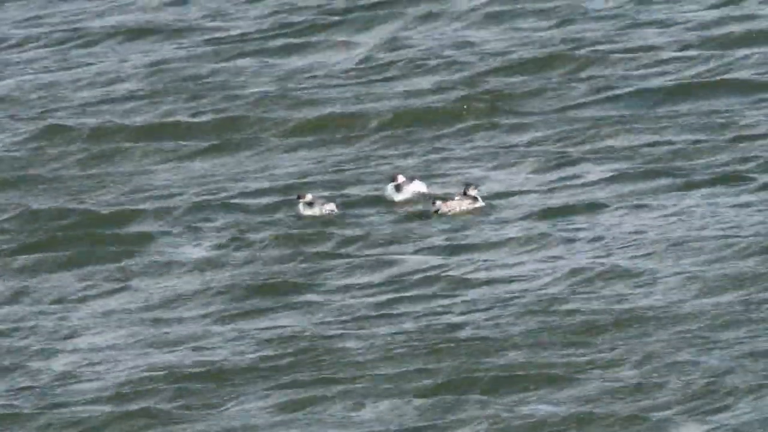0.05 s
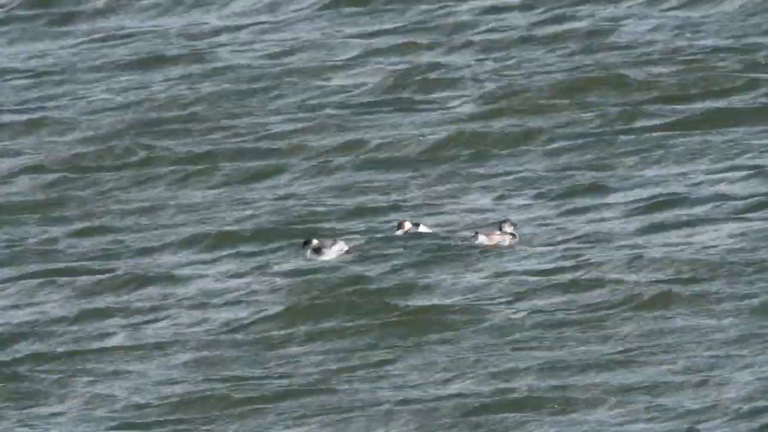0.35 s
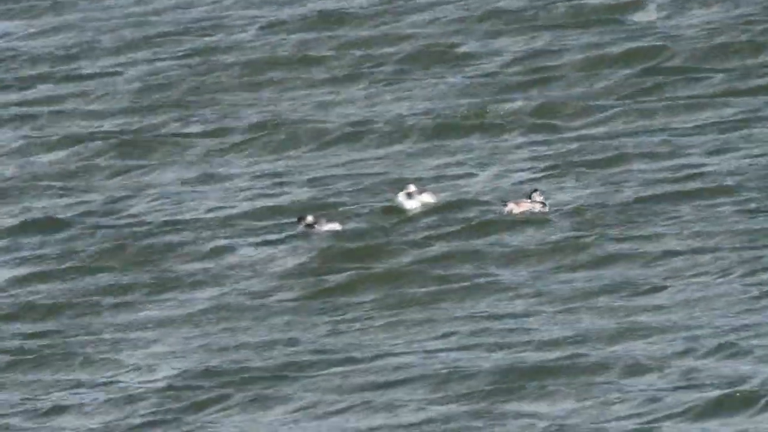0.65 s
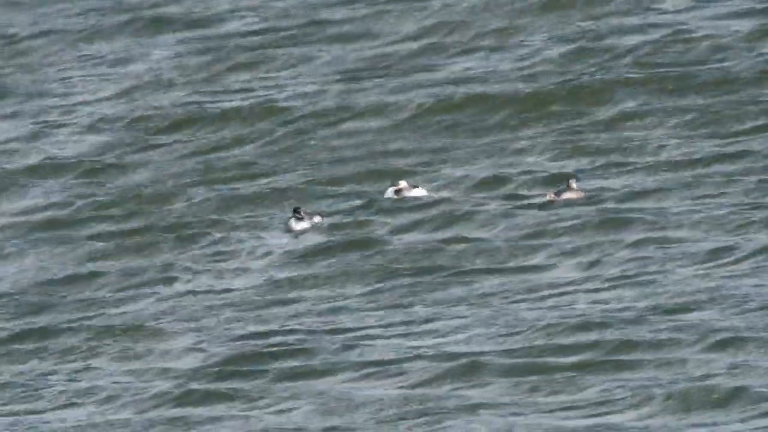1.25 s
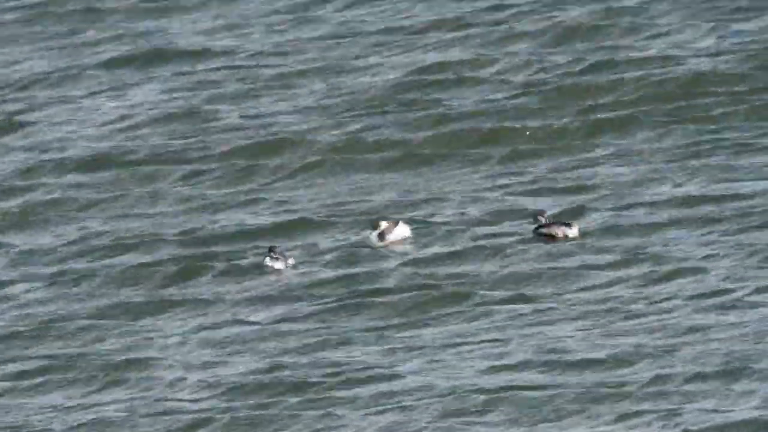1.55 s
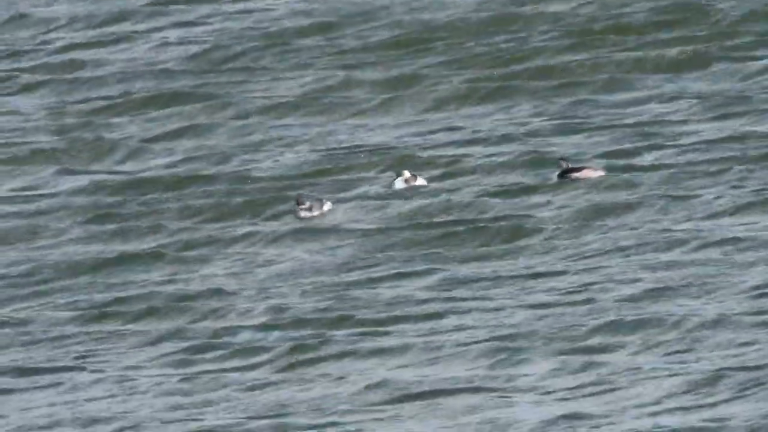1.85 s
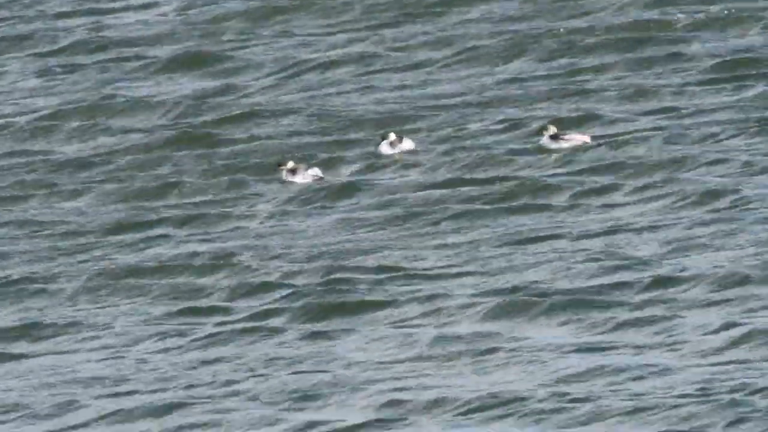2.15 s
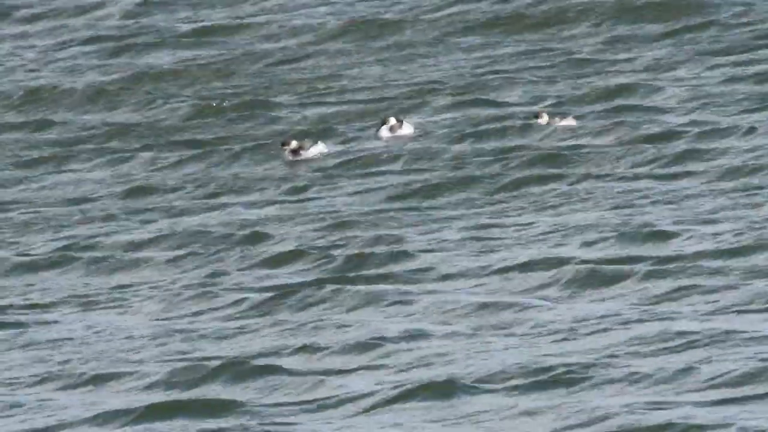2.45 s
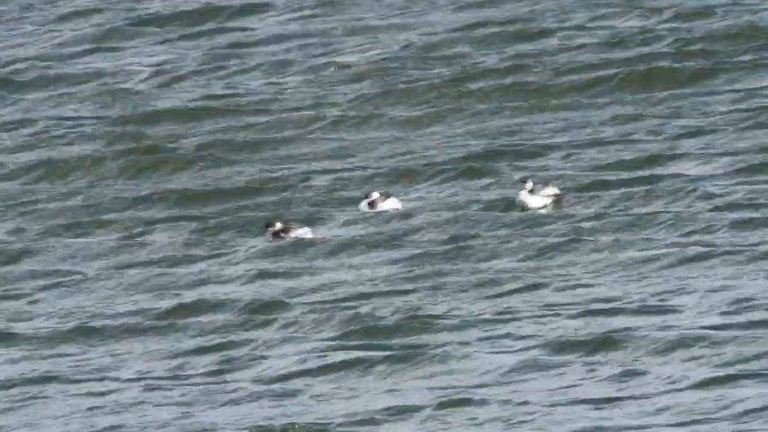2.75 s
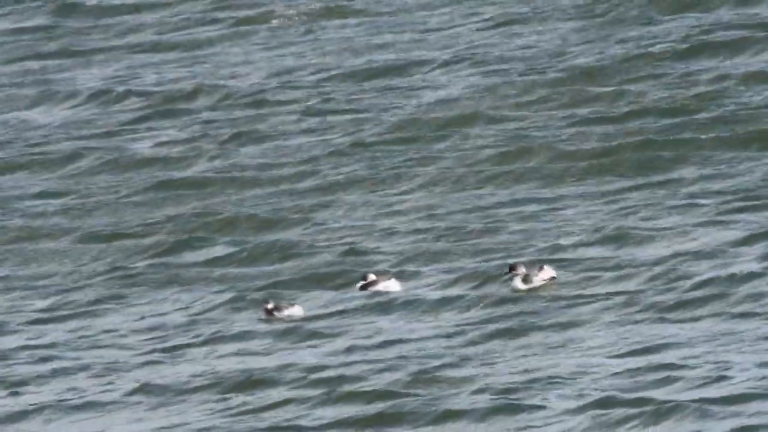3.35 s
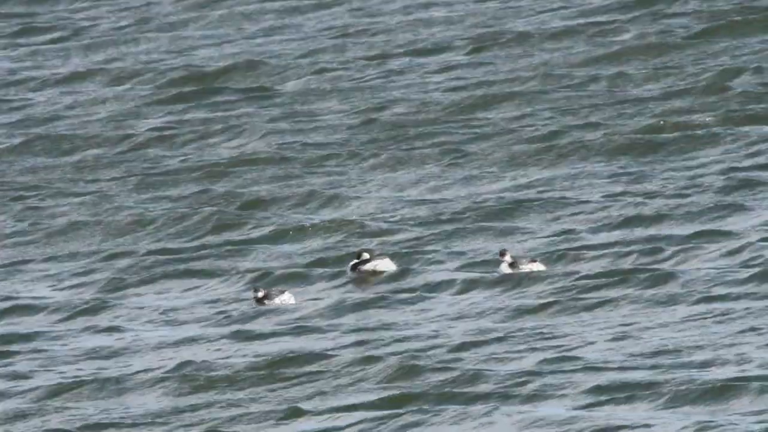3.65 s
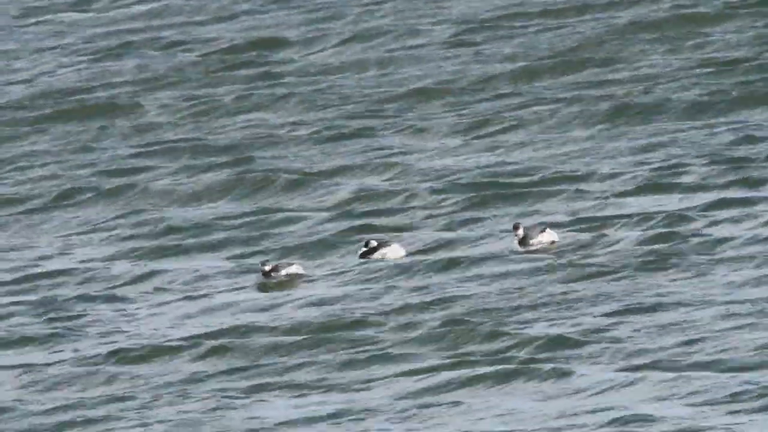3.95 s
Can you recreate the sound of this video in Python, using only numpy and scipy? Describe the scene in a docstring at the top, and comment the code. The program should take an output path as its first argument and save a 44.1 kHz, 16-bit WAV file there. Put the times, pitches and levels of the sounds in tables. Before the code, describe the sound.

Wind rumbles and thumps on the microphone in irregular gusts, with water washing faintly underneath.

```python
"""On the shore of open water, gusty wind buffets the two ports of a camera microphone.
Each port has its own turbulence: a soft, throbbing rumble in the lulls, quicker and brighter as the
wind presses harder, until it overloads the input and rasps. Hard eddies slap the ports, and the
recorder's processing adds a ragged hiss when the wind is loud. Underneath lie the faint wash of
choppy water and one tiny, high tick."""
import sys
import numpy as np
from scipy import signal
from scipy.io import wavfile
from scipy.ndimage import uniform_filter1d

SR = 44100
rng = np.random.default_rng(int(sys.argv[2]) if len(sys.argv) > 2 else 0)


def dump_mix(stems):
    """Bounce the given channels to the path in sys.argv[1] as a 16-bit WAV at rate SR."""
    frames = np.atleast_2d(stems).T  # one column per channel
    limited = np.clip(frames, -1, 1)  # hard clip at full scale
    pcm = np.round(limited * 32767).astype(np.int16)
    wavfile.write(sys.argv[1], SR, pcm)


N = 176400

# Tone of the water bed: pitch_hz, level_db
WATER_TONE = [(200, -58), (700, -71.5), (1200, -70.5), (2000, -69.5), (3300, -85), (5000, -94.5),
              (6500, -86.5), (9500, -101), (14000, -112)]
# Two broad dips the recorder cuts in the background treble: pitch_hz, width_hz
RECORDER_NOTCHES = [(2650, 3800), (7750, 4800)]
# Tone of the recorder's processing hiss: pitch_hz, level_db
RECORDER_HISS_TONE = [(1000, -100), (2600, -91), (4000, -95), (6000, -102.5), (8500, -110), (14000, -118)]
# Cues for hard eddies hitting a port: time_s, side (-1 left, 1 right), accent_db
SLAP_CUES = [(0.047, 1, -3), (0.055, -1, -3), (0.128, 1, -2), (0.146, 1, -2), (0.175, 1, 4), (.496, -1, 12),
             (.611, -1, 12.5), (.635, -1, 15), (0.708, -1, 12.5), (.791, -1, 16), (0.832, -1, 7),
             (0.958, 1, 7.5), (1.041, 1, 9), (1.113, -1, 11.5), (1.161, 1, 14), (1.204, 1, 8),
             (1.263, 1, 8.5), (1.371, -1, 9), (1.397, -1, 11.5), (1.409, 1, 10), (1.520, 1, 12),
             (1.555, 1, 13.5), (1.708, 1, 9.5), (1.763, 1, 12), (1.844, 1, 10.5), (1.861, 1, 11),
             (1.923, 1, 14), (2.15, 1, 9.5), (2.358, 1, 7), (2.406, 1, 13), (2.443, 1, 7.5), (2.493, 1, 12),
             (2.597, 1, 10), (2.636, 1, 8), (2.727, 1, 7.5), (2.747, -1, 7.5), (2.828, -1, 16),
             (2.964, 1, 7.5), (3.001, -1, 7), (3.032, -1, 9), (3.192, -1, 0), (3.238, 1, -0.5),
             (3.327, 1, 8), (3.431, 1, 7), (3.367, -1, 11), (3.512, 1, 3), (3.56, 1, 0), (3.619, 1, 6),
             (3.695, 1, 8), (3.713, 1, 9.5), (3.783, 1, 10), (3.941, -1, 17)]
# Wind at the left port, 0 dB being a typical gust: time_s, strength_db
GUSTS_LEFT = [(0.0, -20.5), (0.06, -15), (0.085, -24), (0.46, -31), (0.489, 4), (0.514, 13), (0.544, -14),
              (0.564, 5), (0.589, -16.5), (0.604, 4), (0.639, 7), (0.656, -9), (0.708, 15), (0.763, 11),
              (0.788, 15), (0.9, 0), (0.922, -33), (0.973, -21.5), (0.988, 2.5), (1.008, 2.5), (1.048, -22),
              (1.073, -6.5), (1.093, -15), (1.112, 9), (1.127, -2), (1.147, 5.5), (1.172, -8.5),
              (1.25, -23.5), (1.272, -1), (1.292, -16.5), (1.322, 0.5), (1.348, -10.5), (1.367, 7),
              (1.382, 0), (1.395, 8.5), (1.412, -7.5), (1.44, -3), (1.455, -18), (1.741, -19),
              (1.831, -16.5), (1.856, 0), (1.896, -15), (1.971, 5), (2.005, 1.5), (2.03, -26),
              (2.055, -2.5), (2.085, -17.5), (2.11, 5), (2.17, -17), (2.2, -16), (2.255, 6), (2.272, -12),
              (2.3, -5), (2.33, -6), (2.42, -22), (2.474, 2), (2.554, -17), (2.639, -4), (2.669, -14),
              (2.725, -20), (2.744, 7), (2.815, 0), (2.824, 16.5), (2.842, 15), (2.852, -2), (2.875, 9.5),
              (2.905, -10), (3.003, 8), (3.018, -15), (3.038, 9.5), (3.09, -16), (3.18, -26), (3.191, -1),
              (3.213, 0), (3.226, -28), (3.263, -18), (3.312, -24.5), (3.367, 8), (3.387, -12), (3.402, 1),
              (3.422, -23), (3.56, -26.5), (3.622, -1), (3.642, -22), (3.69, -22), (3.705, 9), (3.745, 5),
              (3.77, -12), (3.82, -24), (3.838, 10.5), (3.996, 11)]
# Wind at the right port, on the same scale: time_s, strength_db
GUSTS_RIGHT = [(0.0, -21.5), (0.036, -21.5), (0.05, -3), (0.07, -19), (0.11, -24), (0.127, -3), (0.148, -2),
               (0.16, -19.5), (0.19, -6), (0.208, -27.5), (0.3, -37.5), (0.331, -8.5), (0.379, -5),
               (0.409, -18), (0.473, -19.5), (0.489, 1), (0.519, 2), (0.544, -9), (0.564, 5), (0.594, -1),
               (0.619, 13), (0.66, 8), (0.753, 10.5), (0.83, 7), (0.958, 6.5), (0.975, -4), (1.003, 6),
               (1.302, 10), (1.325, 1), (1.417, 10), (1.495, 2), (1.522, 11.5), (1.558, 4), (1.578, -9),
               (1.611, 4), (1.635, -10), (1.711, 8), (1.745, 2), (1.766, 13), (1.78, -8), (1.791, 8),
               (1.864, 15), (1.878, 4), (1.92, 16), (1.98, 7), (2.005, 14), (2.06, 2), (2.08, 8), (2.15, 7),
               (2.172, -2), (2.21, 7), (2.33, 12), (2.388, 2), (2.413, 18), (2.426, 4), (2.514, 14),
               (2.539, 0), (2.599, 10.5), (2.704, -2), (2.73, 6.5), (2.835, 3), (2.854, 11), (2.884, 15),
               (2.905, -7), (2.95, -20), (2.964, 2), (3.098, -5), (3.153, -22), (3.245, -3), (3.272, 8),
               (3.332, 6), (3.354, -18), (3.39, 1), (3.412, -19), (3.428, 3), (3.447, -11), (3.472, 1),
               (3.497, -20.5), (3.523, 6), (3.585, -15), (3.617, 6), (3.66, -8), (3.697, 7), (3.756, 4),
               (3.766, -8.5), (3.783, 6.5), (3.815, -9), (3.836, 7), (3.891, 9.5), (3.965, 1),
               (3.996, 11.5)]
# Tone of the turbulence in a typical gust: pitch_hz, level_db
RUMBLE_TONE = [(20, -47.5), (40, -36.5), (80, -32), (130, -30.5), (200, -34.5), (320, -37.5), (500, -43),
               (800, -49.5), (1200, -60), (2000, -80.5), (3300, -109), (14000, -120)]
# The right port faces the wind, so it is boomier and darker: pitch_hz, gain_db
WINDWARD_EQ = [(40, 0), (130, 1.17), (280, 2.93), (600, 0), (1500, -6.5)]
# How far each band swells as the wind strengthens: pitch_hz, swell_db_per_db
GUST_SWELL = [(30, .5), (80, 0.62), (150, 0.31), (320, 0.46), (550, 0.7763), (1200, 1.41)]
# Eddies shake the level, the treble most: pitch_hz, spread_db
BUFFET_DEPTH = [(40, 0.5), (200, 1.1), (600, 3.5), (1500, 4)]


def from_db(db):
    """Decibels to gain."""
    return 10 ** (np.asarray(db) / 20)


def envelope(points):
    """Straight ramps between timed points, one value a sample."""
    times_s, values = np.transpose(points)
    return np.interp(np.arange(N) / SR, times_s, values)


def at_hz(points, hz):
    """Read a curve on a log-frequency axis."""
    freqs, values = np.transpose(points)
    return np.interp(np.log(hz), np.log(freqs), values)


def drift(corner_hz):
    """A smooth random modulator with a spread of 1, rolling off above corner_hz."""
    hop, settle = 40, 2000
    pole = np.exp(-2 * np.pi * corner_hz * hop / SR)
    noise = rng.standard_normal(N // hop + settle + 2)
    slow = signal.lfilter([1], [1, -2 * pole, pole * pole], noise)[settle:]
    return np.interp(np.arange(N) / hop, np.arange(len(slow)), slow / slow.std())


def noise_bands():
    """Yield the centre pitch and noise of each half-octave band, at 0 dB per Hz."""
    edges = 16 * 2 ** (np.arange(21) / 2)
    for low, high in zip(edges, edges[1:]):
        bandpass = signal.butter(3, [low, high], "band", fs=SR, output="sos")
        noise = signal.sosfilt(bandpass, rng.standard_normal(N + SR // 2))[-N:]
        yield np.sqrt(low * high), noise * np.sqrt(SR / 2)


def shaped_noise(tone):
    """Steady noise coloured by a tone curve."""
    return sum(noise * from_db(at_hz(tone, hz)) for hz, noise in noise_bands())


def water():
    """Small waves blur into an even wash."""
    return shaped_noise(WATER_TONE)


def recorder_dips(bed):
    """The recorder cuts two broad dips in the background treble."""
    for hz, width_hz in RECORDER_NOTCHES:
        bed = signal.lfilter(*signal.iirnotch(hz, hz / width_hz, fs=SR), bed)
    return bed


def tick(time_s=0.129, pitch_hz=4600, level_db=-51.5, width_s=0.003):
    """One faint, high pip in the opening lull."""
    t = np.arange(N) / SR - time_s
    return from_db(level_db) * np.exp(-(t / width_s) ** 2) * np.sin(2 * np.pi * pitch_hz * t)


def recorder_hiss(smooth_s=0.079, ragged_db=3):
    """Ragged, smeared treble from the recorder's processing, swelling when the wind is loud."""
    power = from_db(envelope(GUSTS_LEFT)) ** 2 + from_db(envelope(GUSTS_RIGHT)) ** 2
    loudness_db = 10 * np.log10(uniform_filter1d(power, int(smooth_s * SR)))
    spit_db = ragged_db * drift(corner_hz=270)
    return from_db(loudness_db + spit_db) * shaped_noise(RECORDER_HISS_TONE)


def eddy_slaps(width_s=0.0006):
    """Each hard eddy is one quick swing of pressure, push then pull, at one port."""
    t, ports = np.arange(N) / SR, np.zeros((2, N))
    for time_s, side, accent_db in SLAP_CUES:
        near = np.abs(t - time_s) < 10 * width_s
        widths = (t[near] - time_s) / width_s
        ports[int(side > 0), near] -= from_db(accent_db) * widths * np.exp((1 - widths ** 2) / 2)
    return ports


def slap_puffs(side, lift_db=0.5, attack_s=0.000999, decay_s=0.0042):
    """Each slap stirs up a short puff of turbulence: extra wind strength (linear) at its port."""
    t, strength = np.arange(N) / SR, np.zeros(N)
    for time_s, slap_side, accent_db in SLAP_CUES:
        if slap_side == side:
            near = np.abs(t - time_s) < 10 * decay_s
            age_s = t[near] - time_s
            puff = np.exp(np.minimum(age_s / attack_s, -age_s / decay_s))
            strength[near] += from_db(accent_db + lift_db) * puff
    return strength


def vortex_throb(strength_db, calm_hz=76.04, gust_rise_hz=51.94, wobble=0.33):
    """Vortices peel off the port in a wobbling throb that quickens and swells with the wind."""
    shedding_hz = calm_hz + gust_rise_hz * from_db(strength_db) ** 0.68
    wobbling_hz = shedding_hz * np.exp(wobble * drift(corner_hz=50))
    cycles = np.cumsum(wobbling_hz) / SR
    return from_db(-7 + 0.5 * strength_db) * np.sin(2 * np.pi * cycles)


def wind(gusts, side):
    """Turbulence at one port: stronger wind adds smaller, brighter eddies, in quick buffets."""
    strength = np.hypot(from_db(envelope(gusts)), slap_puffs(side))
    strength_db = 20 * np.log10(strength)
    buffets = drift(corner_hz=62)  # all the bands shake together
    rumble = vortex_throb(strength_db)
    for hz, noise in noise_bands():
        tone_db = at_hz(RUMBLE_TONE, hz) + (side > 0) * at_hz(WINDWARD_EQ, hz)
        swell_db = at_hz(GUST_SWELL, hz) * strength_db
        flutter_db = at_hz(BUFFET_DEPTH, hz) * buffets
        rumble += noise * from_db(tone_db + swell_db + flutter_db)
    return rumble


def scene():
    """The mix: each channel has its own wind, hiss, water and slaps; the tick sits in the centre."""
    left = from_db(-1.05) * wind(GUSTS_LEFT, side=-1) + recorder_hiss()
    left += from_db(-4) * recorder_dips(water())
    right = from_db(-0.96) * wind(GUSTS_RIGHT, side=1) + recorder_hiss()
    right += recorder_dips(water())
    return np.array([left, right]) + from_db(-3.5) * eddy_slaps() + tick()


def record(dry, ceiling=0.98, cutoff_hz=15900):
    """Strong gusts overload the input and rasp; a steep low-pass then takes off the very top."""
    overloaded = np.clip(dry, -ceiling, ceiling)
    lowpass = signal.ellip(10, 0.05, 70, cutoff_hz, fs=SR, output="sos")
    return signal.sosfilt(lowpass, overloaded)


dry = scene()
out = record(dry)
dump_mix(out)
```